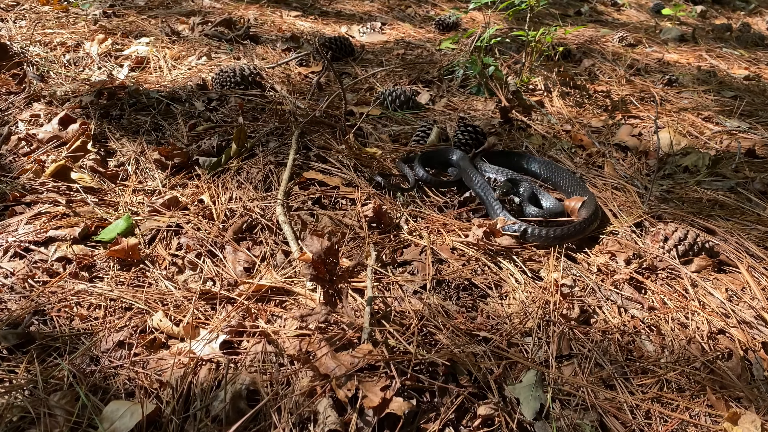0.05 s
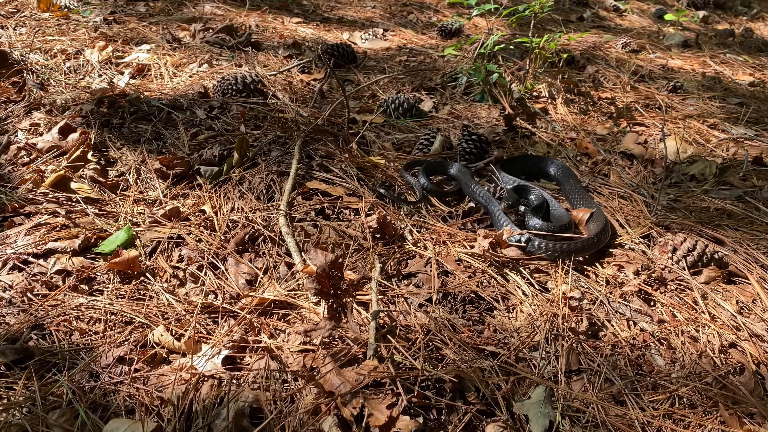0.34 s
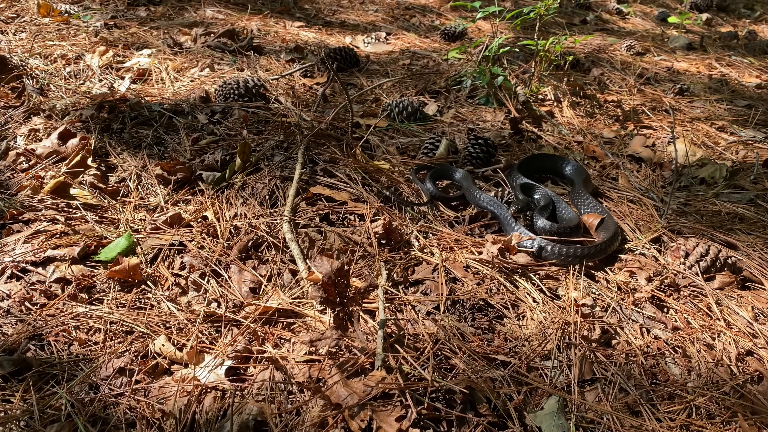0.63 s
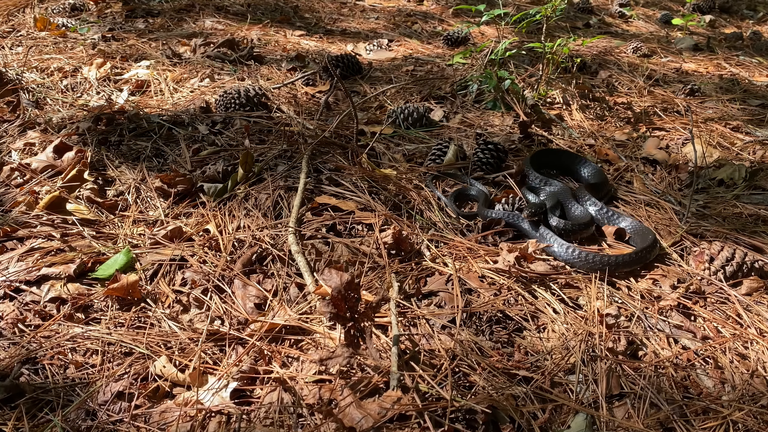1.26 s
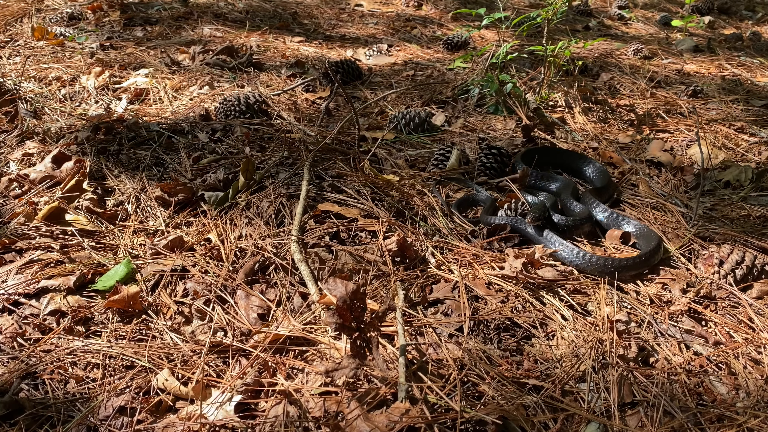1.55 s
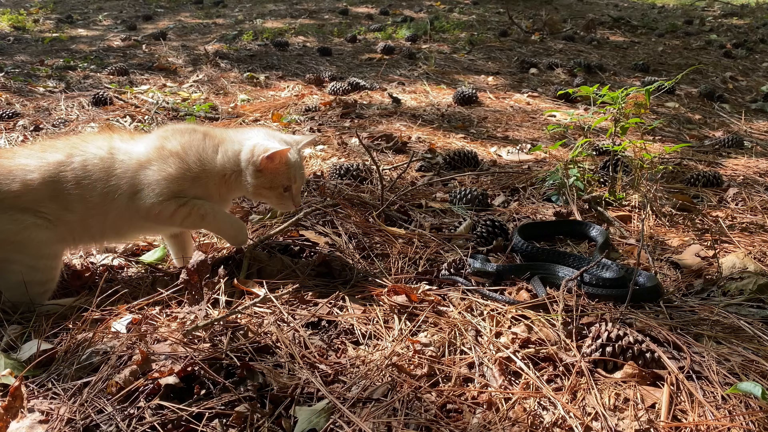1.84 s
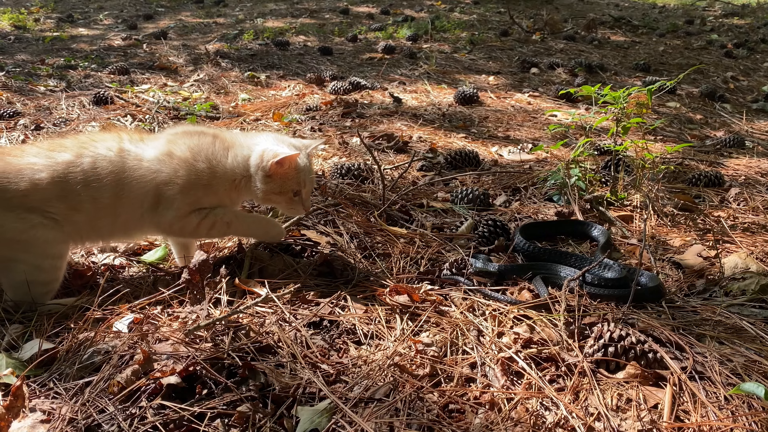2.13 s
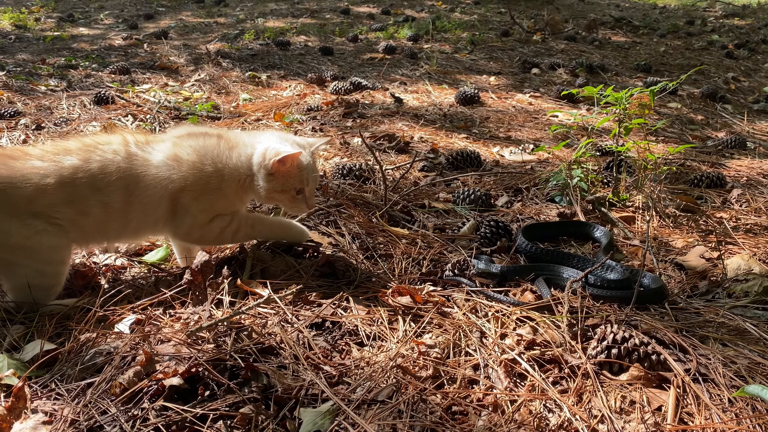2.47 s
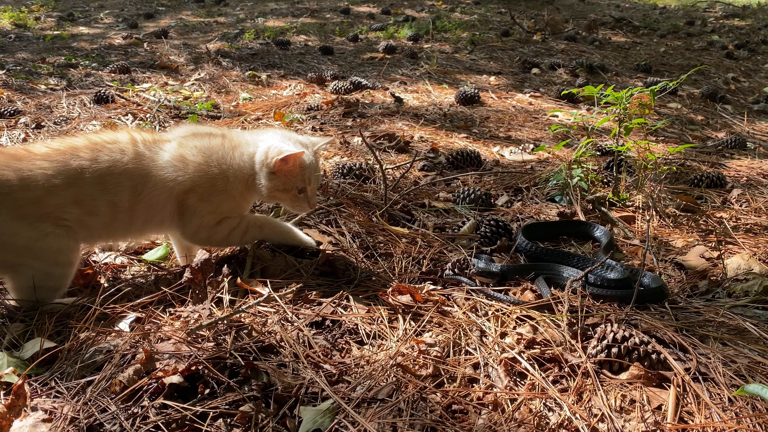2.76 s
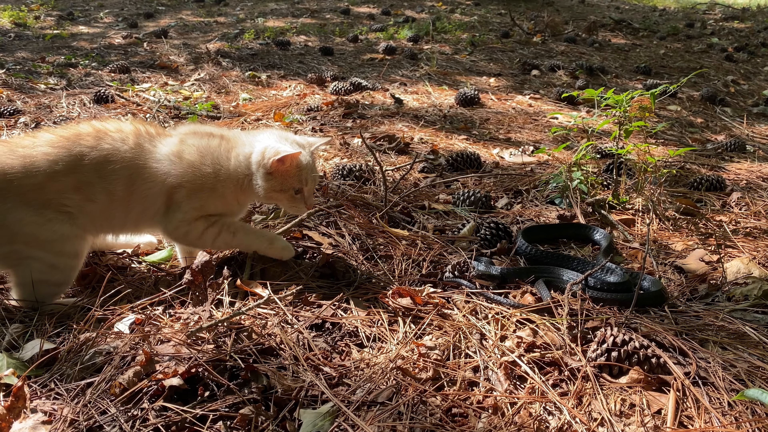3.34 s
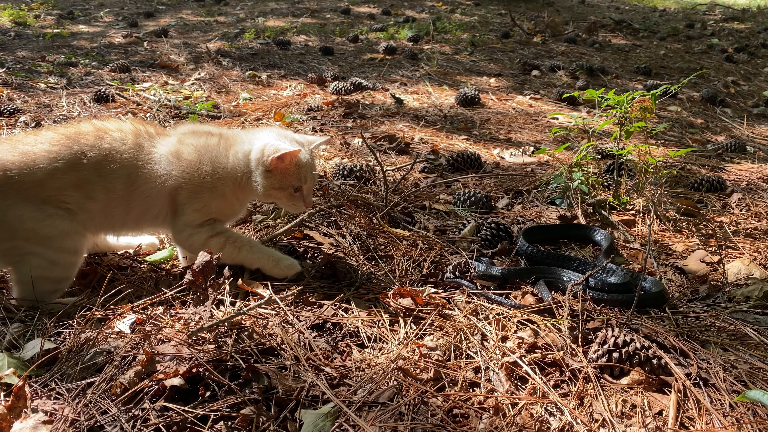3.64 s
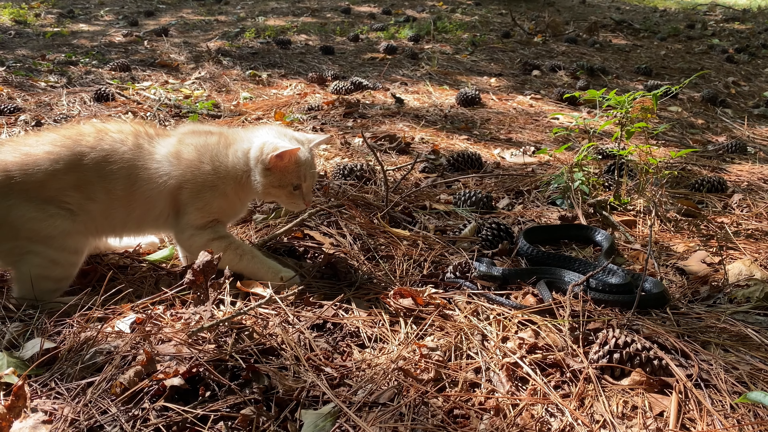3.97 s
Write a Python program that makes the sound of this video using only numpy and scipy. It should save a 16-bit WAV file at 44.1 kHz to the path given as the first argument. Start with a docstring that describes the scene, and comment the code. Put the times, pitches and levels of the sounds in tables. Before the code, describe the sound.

Dry pine needles rustle close by as a snake drags over them, followed by a cat's quieter, careful steps and small twig clicks. Insects hiss faintly in the trees over a low rumble like far traffic.

```python
"""Snake and cat on pine needles

A snake drags its coils through dry needles; then the scene changes and a cat treads carefully on them.
Countless tiny slips make the rustle, clumps crunch as they give way, and twigs snap close by.
Behind them are a high hiss, probably insects in the trees, and a low rumble like distant traffic."""
import sys
import numpy as np
from scipy import signal
from scipy.fft import rfft, irfft, next_fast_len
from scipy.io import wavfile
from scipy.ndimage import uniform_filter1d, map_coordinates

SR = 44100
rng = np.random.default_rng(int(sys.argv[2]) if len(sys.argv) > 2 else 0)


def unload_audio(sound):
    """Save the sound as a 16-bit wav file, at the path given as the first command line argument."""
    columns = np.transpose(np.atleast_2d(sound))
    # keep every value between -1 and 1, then stretch to whole-number steps
    steps = np.round(np.clip(columns, -1, 1) * 32767)
    wavfile.write(sys.argv[1], SR, steps.astype(np.int16))


N = 176400
TIME = np.arange(N) / SR
SCENE_CHANGE_S, TOP_HZ = 1.882, 15850
LEFT_RIGHT = np.array([[.5], [-.5]])  # shares a difference between the two ears


def amp(db):
    """Turn decibels into a gain."""
    return 10 ** (np.asarray(db) / 20)


def unit(x):
    """Scale to an average (rms) level of 1."""
    return x / np.sqrt(np.mean(x ** 2) + 1e-20)


def pan(db):
    """Gains that make the left ear db louder than the right."""
    return amp(db * LEFT_RIGHT)


def along(points, hz):
    """Read a table of (f/Hz, value) on a log frequency scale."""
    f, values = np.transpose(points)
    return np.interp(np.log(hz + 1), np.log(f + 1), values)


def curve(rows):
    """Join (t/s, value) points with straight lines."""
    return np.interp(TIME, *np.transpose(rows))


def wobble(rate):
    """A smooth curve through `rate` random values a second."""
    return map_coordinates(rng.standard_normal(2000), [TIME * rate], mode="wrap")


def filtered(x, response):
    """Give each frequency the gain response(hz)."""
    size = next_fast_len(N + SR // 4)
    return irfft(rfft(x, size) * response(np.fft.rfftfreq(size, 1 / SR)), size)[..., :N]


def stereo(pair, mid_tone, side_tone):
    """Shape two noises into mid (what the ears share) and side (how they differ); give left and right."""
    mid, side = filtered(pair, lambda hz: amp([along(mid_tone, hz), along(side_tone, hz)]))
    return unit(np.array([mid + side, mid - side]))


def snake_scene():
    """1 during the snake's scene, 0 during the cat's."""
    return np.clip((SCENE_CHANGE_S - TIME) / 0.0043, 0, 1)


def crackle(rate, spread_db, life_s, rub_db, count=24000, size=96):
    """Dry needles slip `rate` times a second, each ringing at its own pitch, over smooth rubbing."""
    when, pitch, strength, phase = rng.random((count, 4)).T
    used = np.arange(count) < rate * N / SR
    gain = used * amp(spread_db * np.minimum(-np.log(1 - strength), 4))  # many weak, few strong
    t = np.arange(size) / SR
    ring = gain[:, None] * np.exp(-t / life_s + 2j * np.pi * TOP_HZ * pitch[:, None] * t)
    shifted = ring * np.exp(2j * np.pi * phase)[:, None]
    at = ((when * N).astype(int)[:, None] + np.arange(size)).ravel()
    slips = np.array([np.bincount(at, r.imag.ravel(), N + size)[:N] for r in (ring, shifted)])
    return unit(slips) + amp(rub_db) * rng.standard_normal((2, N))


# How loud the sliding is: t/s, level/dB
SLIDE_LEVELS = [(0, -45.5), (.2, -47), (.36, -47), (.46, -49), (.62, -48.5), (.77, -49.5), (.81, -46.5),
                (.93, -46), (1.0, -40.5), (1.045, -38), (1.12, -42.5), (1.17, -43), (1.21, -41),
                (1.25, -45.5), (1.3, -41), (1.345, -44.5), (1.4, -43), (1.46, -47), (1.56, -50),
                (1.65, -48), (1.715, -49.5), (1.755, -43), (1.87, -42.5)]
# Tone of the gentle and the hard rustle as heard, mid and side: f/Hz, level/dB
GENTLE_MID_TONE = [(100, 8), (600, -9.5), (1500, -3), (2300, -2.5), (3200, -2), (4200, 0.5), (4900, -12),
                   (5500, -1), (7000, 0), (9000, 1.5), (10700, -7.5), (11700, -30), (12600, -66),
                   (16000, -70)]
GENTLE_SIDE_TONE = [(60, -15), (200, 7.5), (500, -3.5), (1100, -1), (1900, -10), (2600, 2), (3600, 0.5),
                    (4900, 4), (5900, -21), (8000, 0), (11000, -0.5), (14000, -5.5), (15800, -14)]
HARD_MID_TONE = [(100, 3), (600, -5), (1200, 2), (2500, 2.5), (3200, -39), (4700, -11), (5500, 7),
                 (7000, 2), (9000, 0.5), (11500, 0), (13000, -49)]  # sound processing leaves a gap near 3200 Hz
HARD_SIDE_TONE = [(100, -10), (1100, 5.5), (1900, 0), (3300, -1), (5300, 7.5), (6300, -1), (8500, 2.5),
                  (11500, 3), (14000, -2), (15800, -8)]
# Where the rustle sits between the ears: f/Hz, left minus right/dB
SNAKE_PAN = [(200, -4.5), (1000, -3.5), (2000, 0), (4000, -1), (8000, -.5), (10500, 0)]

def snake(shove_from_db=-45, shove_full_db=-37, shove_boost_db=2.5, surge_db=1.13, split_hz=4060):
    """Scales drag over the needles in a dense, uneven rustle, fuller when a coil shoves hard."""
    slips = crackle(rate=4200, spread_db=2, life_s=0.00017, rub_db=0)
    gentle = stereo(slips, GENTLE_MID_TONE, GENTLE_SIDE_TONE)
    hard = amp(shove_boost_db) * stereo(slips, HARD_MID_TONE, HARD_SIDE_TONE)
    level_db = curve(SLIDE_LEVELS)
    effort = np.clip((level_db - shove_from_db) / (shove_full_db - shove_from_db), 0, 1)
    drag = filtered(gentle + effort * (hard - gentle), lambda hz: pan(along(SNAKE_PAN, hz)))
    low = filtered(drag, lambda hz: 1 / (1 + (hz / split_hz) ** 4))
    high = drag - low
    rustle = low * amp(surge_db * wobble(70)) + high * amp(surge_db * wobble(110))
    return rustle * amp(level_db + 1.7 * wobble(40.1)) * snake_scene()


# How loud the insect hiss is: t/s, level/dB
HISS_LEVELS = [(0, -50.5), (1.7, -51), (1.9, -49), (2.25, -49), (2.45, -51), (3.0, -50), (3.2, -51),
               (3.55, -51), (4, -50)]
# Tone of the hiss, mid and side: f/Hz, level/dB
HISS_MID_TONE = [(800, -28.5), (2000, -32), (3950, -11.5), (4200, -4), (4900, -9.5), (5800, -3),
                 (7000, -3.5), (7900, -7), (8500, -31.5), (11000, -14.5), (12500, -97)]
HISS_SIDE_TONE = [(800, -23), (2000, -34), (3950, -10), (4200, -9.5), (5500, -3.5), (7000, -7), (8500, -6),
                  (9500, -12.5), (10800, -26), (15000, -65)]

def insects(swell_db=10.5, swell_above_hz=4700):
    """A hissing chorus whose narrow high bands swell and fade at random."""
    hz, _, bands = signal.stft(rng.standard_normal((2, N)), SR, nperseg=4096)
    drift = uniform_filter1d(rng.standard_normal(bands.shape), size=10, axis=2)
    swell = amp(swell_db * np.tanh(unit(drift)) * (hz > swell_above_hz)[:, None])
    chorus = signal.istft(bands * swell, nperseg=4096)[1][:, :N]
    return stereo(chorus, HISS_MID_TONE, HISS_SIDE_TONE) * amp(curve(HISS_LEVELS))


# Whistles in the hiss: start t/s, end t/s, f/Hz, level/dB, left ear's phase lead/rad
WHISTLE_NOTES = [(0, 2.2, 4302, -66, 2.9), (0, 2.2, 4815, -66, 3.1), (0, 1.8, 5212, -65.5, -1.2),
                 (0, 2, 7342, -66, 1.5), (.6, 2.1, 7785, -66, 1.4), (1.35, 1.95, 6321, -61, 1),
                 (1.6, 2, 6827, -56.5, 1), (1.2, 2.7, 7445, -64.5, .6), (1.86, 2.85, 4220, -64.5, -1.4),
                 (1.86, 3, 4378, -70, 0), (1.86, 2.8, 4716, -70, .9), (1.86, 2.7, 4802, -68, -1.2),
                 (1.86, 3.1, 4963, -72, 0), (1.86, 3.3, 5380, -66, -1.8), (2.2, 3.1, 5620, -67, 0),
                 (1.86, 2.62, 5957, -57, -.1), (2.45, 4.4, 5950, -68, 0), (1.86, 2.6, 6451, -62, 2.4),
                 (1.86, 3.35, 6947, -62, 1.6), (1.9, 2.55, 7036, -65, 0), (1.86, 2.55, 8193, -61, 2.8),
                 (2.4, 3.3, 5792, -63, -2.6), (2.9, 4, 6195, -64, -.2), (3.22, 3.54, 5722, -58, .8)]

def whistles(rise_s=.05, fade_share=.42, waver_db=2.2):
    """Each thin whistle starts quickly, wavers, and fades over the last part of its length."""
    out = np.zeros((2, N))
    for start, end, hz, db, lead in WHISTLE_NOTES:
        rise = (TIME - start) / rise_s
        fade = (end - TIME) / (end - start) / fade_share
        level = amp(db + waver_db * wobble(12)) * np.clip(np.minimum(rise, fade), 0, 1)
        phase = 2 * np.pi * hz * TIME + .5 * wobble(30.57) + lead * LEFT_RIGHT
        out += np.sqrt(2) * level * np.sin(phase)
    return out


# Tone of the rumble: f/Hz, level/dB
RUMBLE_TONE = [(15, -54), (30, -10), (42, -12), (54, 3), (105, 0), (135, -9), (200, -17), (300, -28),
               (500, -40), (1000, -69), (3000, -116)]
# Its side compared with its mid: f/Hz, level/dB
RUMBLE_WIDTH = [(50, -32), (120, -17.5), (250, -11.5), (600, 3)]

def rumble(level_db=-40.5, pan_db=-2.5):
    """Far, low noise, nearly alike in both ears; a little to the right in the snake's scene."""
    side_tone = [(hz, db + along(RUMBLE_WIDTH, hz)) for hz, db in RUMBLE_TONE]
    noise = stereo(rng.standard_normal((2, N)), RUMBLE_TONE, side_tone)
    return amp(level_db) * pan(pan_db * snake_scene()) * noise


# Clumps of needles giving way: t/s, level/dB, f/Hz, length/s
CLUMPS = [(.1, -42, 6150, 0.0054), (.243, -42, 8450, .008), (.348, -42, 7900, 0.0079),
          (.366, -42, 2800, 0.0076), (.652, -44.5, 3940, 0.014), (1.196, -46, 5400, 0.015),
          (1.383, -26, 6900, 0.0028), (1.424, -50, 5200, 0.0044), (1.588, -43, 7000, .004),
          (1.603, -49, 11000, 0.0044), (2.727, -44, 9100, 0.0049), (2.872, -44, 11100, 0.0064),
          (2.958, -52, 7000, 0.0043), (3.236, -48, 11000, 0.0085), (3.552, -43, 11000, 0.0052),
          (3.636, -38, 5800, .006), (3.763, -49, 8000, 0.0036), (3.99, -39, 9000, 0.0058)]

def crunches(rise_s=0.0035, width_octaves=0.52, top_hz=12600, size=4096):
    """A clump of needles gives way in a brief spray of tiny slips."""
    out = np.zeros((2, N + size))
    t, hz = np.arange(size) / SR, np.fft.rfftfreq(size, 1 / SR)
    slips = crackle(rate=6200, spread_db=2.5, life_s=0.000092, rub_db=12.5)
    treble_cut = 1 / np.hypot(1, (hz / top_hz) ** 20)  # soft needles make nothing higher
    for k, (start, db, pitch, length) in enumerate(CLUMPS):
        band = np.exp(-.5 * (np.log2((hz + 1) / pitch) / width_octaves) ** 2) * treble_cut
        spray = unit(irfft(rfft(slips[:, k * size:][:, :size]) * band))
        swell = (1 - np.exp(-t / rise_s)) * np.exp(-(t / length) ** 2)
        out[:, round(start * SR):][:, :size] += amp(db) * spray * swell
    return out[:, :N]


# Needles and twigs that snap or knock: t/s, level/dB, f/Hz, time to fade 60 dB/s, left minus right/dB
BREAKS = [(0.1029, -23.5, 6460, 0.0017, 2), (0.162, -16, 8500, 0.00042, 3), (.648, -19.5, 6800, 0.0009, -5),
          (0.6627, -15, 6800, 0.0014, 0), (.926, -15, 7600, 0.0014, 0), (0.9777, -25.5, 5670, 0.012, -4),
          (1.065, -26, 5800, 0.0046, -7), (1.1993, -27, 6300, 0.0018, 0), (1.2965, -20, 5840, 0.0012, 0),
          (2.544, -31, 2000, 0.0024, -10), (2.571, -38, 1700, 0.0079, -6), (2.6185, -23, 11900, 0.00058, 0),
          (2.649, -41.5, 1660, 0.012, -7), (2.65, -41, 516, 0.016, 3), (3.145, -35, 2720, 0.0051, 1),
          (3.237, -34, 1970, 0.0023, -6), (3.5855, -33.5, 1500, 0.015, 1), (3.5872, -22, 780, 0.0046, 7.5),
          (3.5869, -30, 370, 0.017, 9), (3.68, -21, 11800, 0.0016, -1), (3.687, -36.5, 2460, 0.0062, 3),
          (3.7392, -14.5, 11900, 0.0011, -2), (3.803, -22.5, 2170, 0.0025, -3),
          (3.8228, -26, 5600, 0.0012, -7), (3.8227, -19.5, 11500, 0.0013, 0),
          (3.8245, -29, 2400, 0.0027, -2)]

def snaps(splinter_db=-15, splinter_s=0.018, left_lead_rad=-1.16, size=2048):
    """A break rings for a few cycles and leaves a short crumble of splinters around its pitch."""
    out, t = np.zeros((2, N + size)), np.arange(size) / SR
    for start, db, hz, ring_s, pan_db in BREAKS:
        ring_level = (1 - np.exp(-2 * hz * t)) * amp(-60 * t / ring_s)
        ring = ring_level * np.sin(2 * np.pi * hz * t + left_lead_rad * LEFT_RIGHT)
        crumble = rng.standard_normal((2, size)) * np.exp(-t / min(splinter_s, 2 * ring_s))
        band = signal.butter(2, [hz / 2, min(hz * 1.5, TOP_HZ)], "band", fs=SR)
        snap = signal.lfilter(*band, ring + amp(splinter_db) * crumble)
        out[:, round(start * SR):][:, :size] += amp(db) * pan(pan_db) * snap
    return out[:, :N]


# Paws pressing down: t/s, length/s, rise time/s, level/dB
PAW_STEPS = [(2.02, 0.054, 0.045, -60.5), (2.288, 0.13, 0.13, -61), (2.403, 0.052, .05, -50),
             (2.513, 0.056, .04, -52), (2.607, 0.064, 0.033, -53), (2.704, 0.05, .04, -55),
             (2.845, .056, 0.053, -53.5), (2.919, 0.078, 0.036, -52.5), (3.055, 0.13, .04, -61.5),
             (3.223, .017, .03, -55), (3.323, .07, 0.05, -60), (3.43, .035, 0.058, -46.5),
             (3.495, 0.15, 0.031, -55), (3.673, 0.1, .02, -50), (3.791, 0.034, 0.032, -46),
             (3.865, 0.022, 0.036, -55), (3.911, 0.029, .04, -47.5), (3.979, .03, 0.034, -44.5)]
# Tone of the paw rustle as heard, mid and side: f/Hz, level/dB
# The deep treble gaps come from microphone spacing and audio coding.
PAW_MID_TONE = [(100, 8), (550, 4.5), (1200, -4.5), (2000, 3), (4000, 2.5), (7500, -3.5), (8600, -41),
                (9500, 2.5), (11000, 3), (12600, 0), (13500, -37), (15300, -8.5)]
PAW_SIDE_TONE = [(100, -7), (600, -2.5), (1600, -7), (3000, 3.5), (5000, -7), (8500, 3), (10000, 1),
                 (11100, -16), (12300, -0.5), (13500, -1), (15500, -15)]

def cat(release_s=0.037, settle_db=-65.5, flutter_db=1.5):
    """Each paw eases onto the needles, which crackle and then settle under the standing cat."""
    power = amp(settle_db) ** 2 * (1 - snake_scene())
    for start, length, rise, db in PAW_STEPS:
        press = (1 + np.tanh(2 * (TIME - start) / rise)) / 2
        release = np.exp(-np.maximum(TIME - start - length, 0) / release_s)
        power += (amp(db) * press * release) ** 2
    slips = crackle(rate=3200, spread_db=4.5, life_s=0.00029, rub_db=4)
    return stereo(slips, PAW_MID_TONE, PAW_SIDE_TONE) * np.sqrt(power) * amp(flutter_db * wobble(130))


def scene():
    """The animals on the needles, in front of the insects and the rumble."""
    return snake() + cat() + crunches() + snaps() + insects() + whistles() + rumble()


def record(dry):
    """Remove the very highest treble."""
    return filtered(dry, lambda hz: hz < TOP_HZ)


dry = scene()
out = record(dry)
unload_audio(out)
```